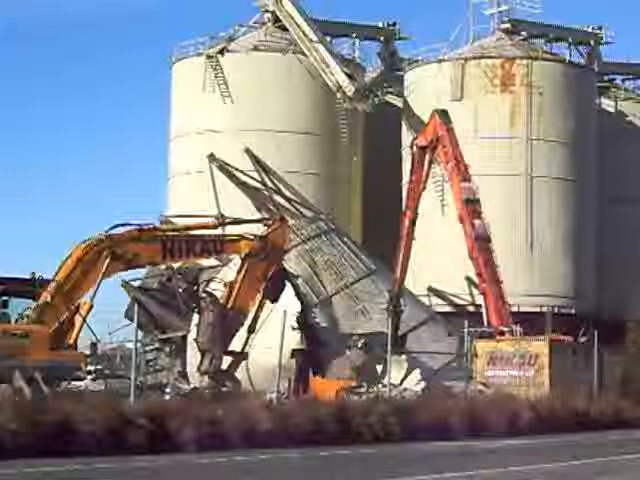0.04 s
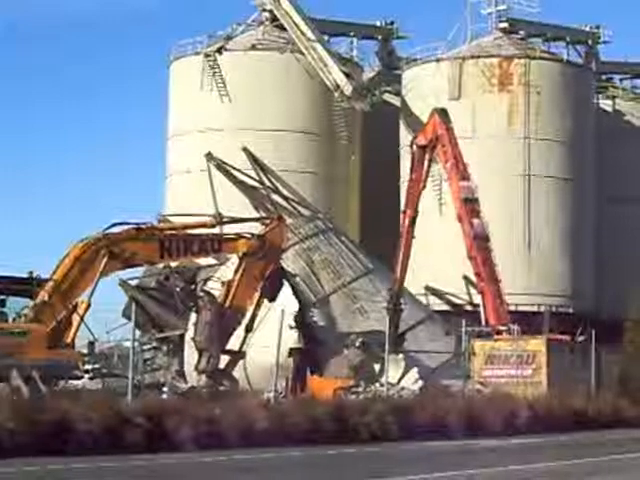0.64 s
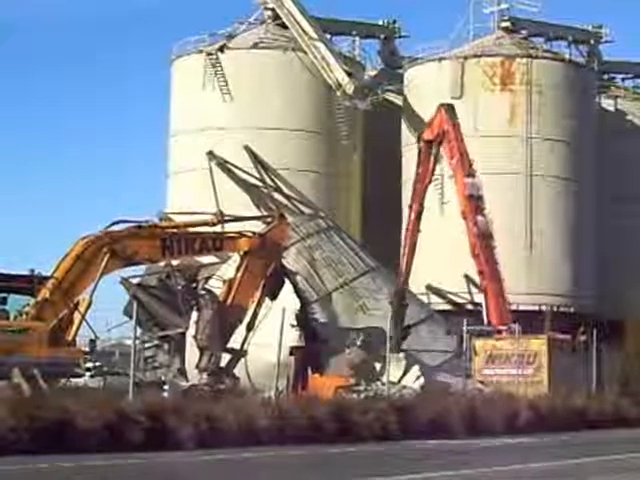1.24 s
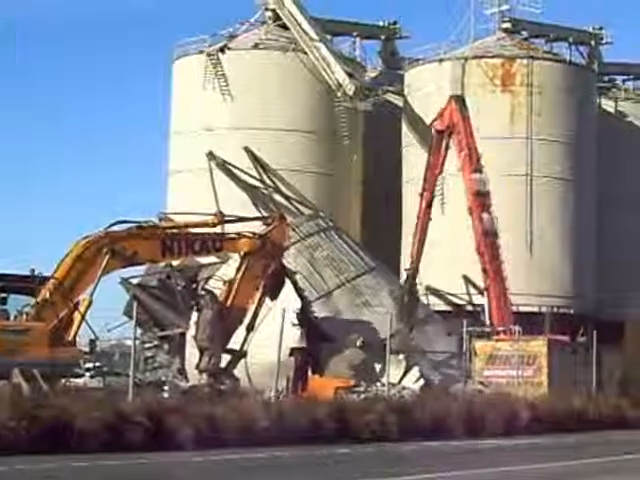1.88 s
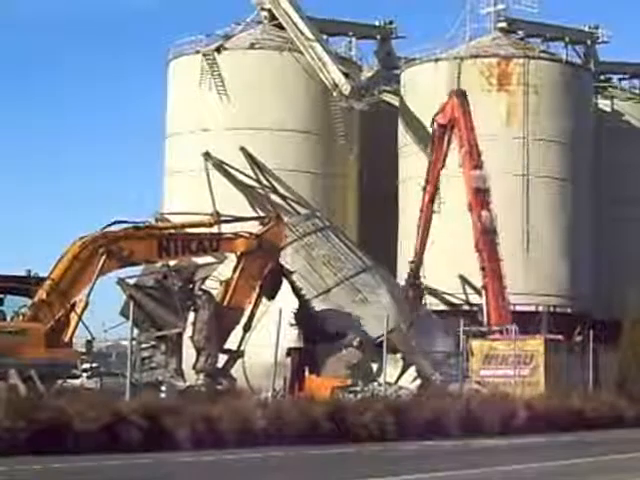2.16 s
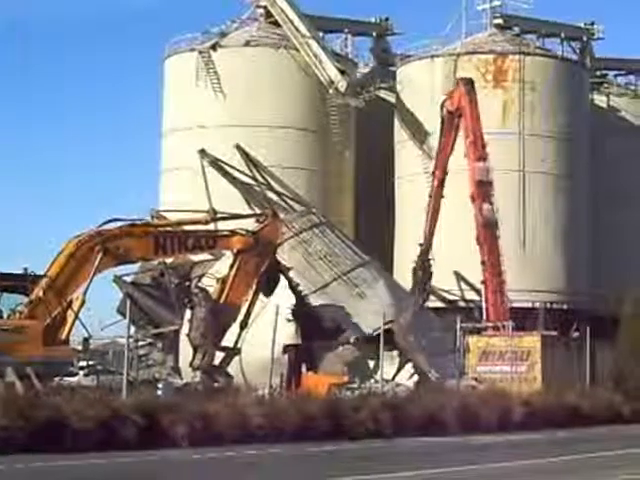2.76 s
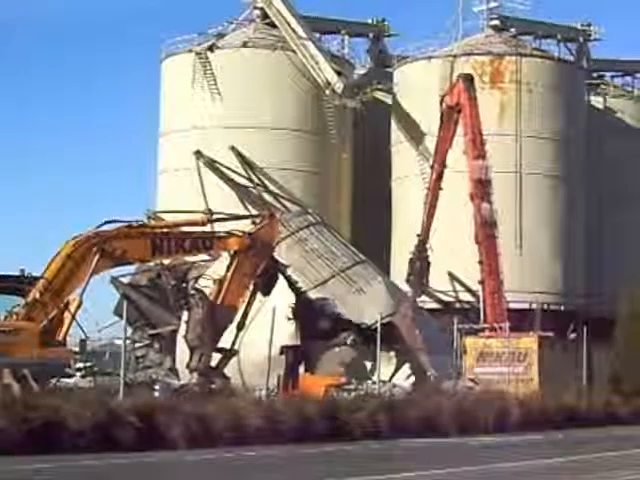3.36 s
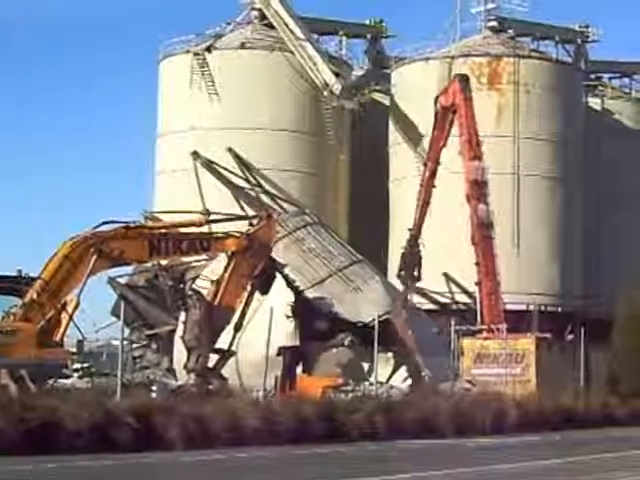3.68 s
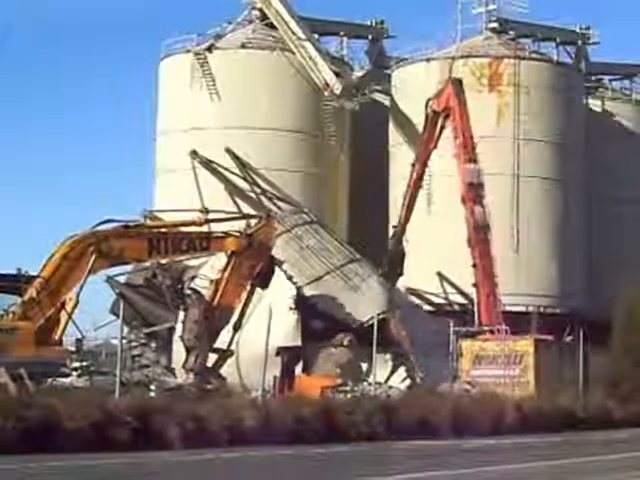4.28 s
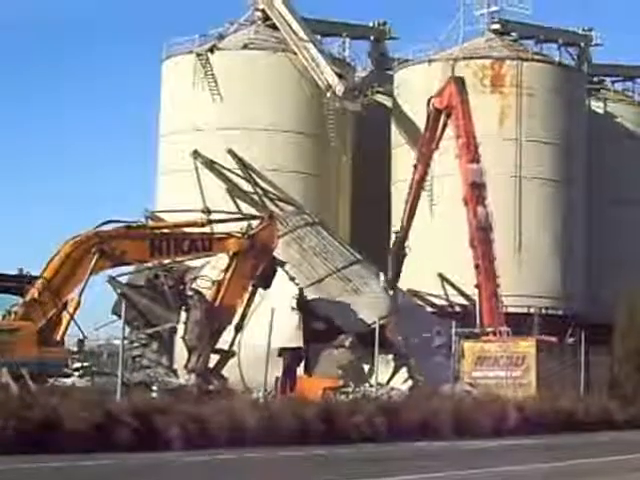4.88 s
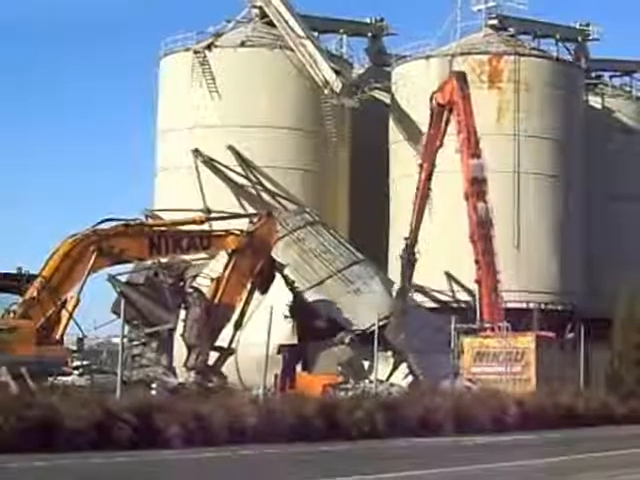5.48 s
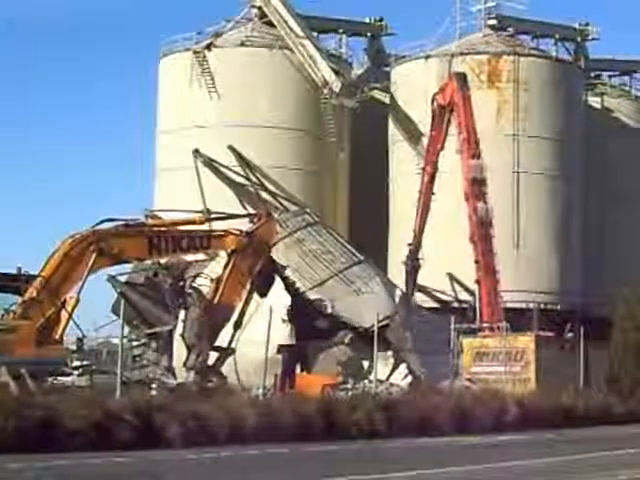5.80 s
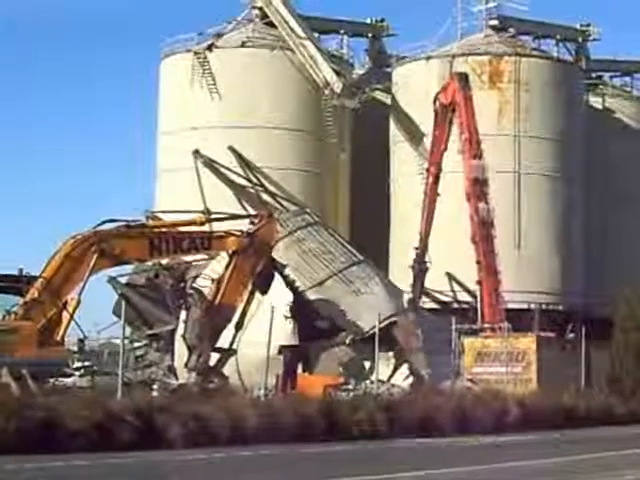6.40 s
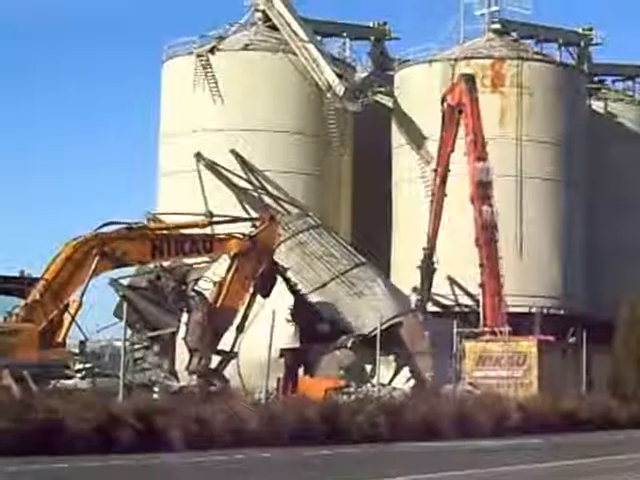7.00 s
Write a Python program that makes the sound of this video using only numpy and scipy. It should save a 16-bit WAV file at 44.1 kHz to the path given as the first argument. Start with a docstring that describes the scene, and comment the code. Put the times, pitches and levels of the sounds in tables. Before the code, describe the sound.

Heard from across a road, demolition machines hum steadily as they pull at a steel silo. Faint creaks and ticks lead to a loud run of metal cracks, deep thuds, hollow booming and tumbling debris. Lighter snaps follow, then a rasping slide with a short squeal, and a last group of sharp cracks. Wind buffets the small microphone, growing stronger as the collapse begins.

```python
"""Tearing down a steel silo

Two excavators work across a road from a small microphone. Over the drone of their diesels the shell
creaks and gives way: steel cracks and snaps, the hollow drum booms, rubble pours, and a plate scrapes
down with a short squeal. Cracks and snaps echo off the standing silos; wind rumbles on the microphone."""
import sys
import numpy as np
from scipy import signal
from scipy.fft import rfft, irfft, next_fast_len
from scipy.io import wavfile
from scipy.ndimage import uniform_filter1d, minimum_filter1d

SR = 44100
rng = np.random.default_rng(int(sys.argv[2]) if len(sys.argv) > 2 else 0)


def waveform_to_disk(signal):
    """Save audio, clipped to [-1, 1], as 16-bit WAV at the path in sys.argv[1]."""
    frames = np.transpose(np.atleast_2d(signal))
    scaled = np.clip(frames, -1, 1) * 32767
    samples = np.round(scaled).astype(np.int16)
    wavfile.write(sys.argv[1], SR, samples)


N = 319725
TIME = np.arange(N) / SR

# The working diesel picks up speed and holds it. Each row: time in seconds, firing rate in Hz, level in dB.
DIESEL_RUN = [(0.21, 84.7, -31), (0.55, 86.9, -23), (0.798, 90.5, -26), (1.85, 93.3, -25), (2.3, 91, -27.5),
              (5.198, 93, -26), (6.2, 92.3, -35.5), (7.25, 90.4, -31)]
# Steadier tones of the machines. Each row: pitch in Hz, level in dB.
MACHINE_HUMS = [(76.5, -32), (214, -39), (259, -41.5), (544, -47), (768, -54.5)]
# Wind on the microphone. Each row: time in seconds, level in dB.
WIND_LEVELS = [(0.21, -36), (1.7, -38), (2.6, -22.5), (3.4, -25), (4.5, -25.5), (7.25, -25.5)]
# Faint dry ticks close by. Each row: time in seconds, relative level in dB.
NEAR_TICKS = [(0.2514, -23), (0.272, -21), (0.6216, -23), (0.808, -23), (1.1102, -22), (1.431, -19),
              (1.447, -17.5), (1.4643, -19), (1.66, -18.5), (2.1121, -11.5)]
# Steel crackling under the pull of the machines. Each row: time in seconds, relative level in dB.
STRAIN_LEVELS = [(0.25, -39), (1.0, -38.5), (1.7, -29.5), (2.3, -33), (4.1, -34.5), (4.7, -29),
                 (7.25, -38.5)]
# Loaded steel creaks. Each row: start and length in seconds, first and last pitch in Hz, level in dB.
STEEL_CREAKS = [(.27, .06, 850, 915, -37), (0.555, 0.16, 782, 797, -33), (0.922, 0.092, 820, 914, -34)]
# Steel giving way. Each row: start in seconds, tear level in dB, tear decay in seconds,
# clatter level in dB, clank level in dB. The levels are relative.
STEEL_CRACKS = [(0.423, -23.5, 0.02, -31.5, -24), (0.511, -29.5, 0.009, -46.5, -26),
                (1.727, -33.5, 0.0077, -23, -21), (1.821, -17, 0.016, -24.5, -14),
                (2.277, -22.5, 0.0042, -28.5, -34), (2.388, -16.5, 0.022, -36, -40),
                (2.401, -4, 0.014, -21, -10.5), (2.497, -24.5, 0.016, -42, -30),
                (2.569, -22, 0.0096, -38, -18), (2.724, -13.5, 0.013, -19, -18),
                (3.048, -12.5, 0.0032, -28, -20.5), (3.220, -11.5, 0.0092, -23.5, -21.5),
                (3.553, -19.5, 0.023, -31, -16), (5.903, -20.5, 0.033, -28, -31),
                (6.274, -7, 0.0043, -23, -10.5), (6.328, -18, .012, -30, -20.5),
                (6.587, -5.5, 0.012, -19, -13)]
# Ring of the torn plates. Each row: pitch in Hz, relative level in dB, seconds to fall by 60 dB.
PLATE_MODES = [(1717, 6.5, 0.21), (2000, -0.5, 0.21), (2210, -10.5, 0.087), (2410, -3, 0.18),
               (2610, -6.5, 0.27), (2750, -7.5, 0.04), (2710, 5.5, 0.14), (3250, -6.5, 0.2),
               (3800, -7.5, 0.029)]
# Slap off the standing silos. Each row: delay in seconds, level in dB.
SILO_ECHOES = [(.028, -7.5), (.056, -23), (.093, -13.5)]
# Sections coming down. Each row: start in seconds, then relative levels of rubble, boom and grit in dB.
SECTION_FALLS = [(1.705, -18, -19.5, -37), (1.92, -21.5, -17.5, -32.5), (2.22, -31.5, -18.5, -38.5),
                 (2.38, -27, -12, -41), (2.715, -17, -13.5, -25), (3.22, -22.5, -14, -38.5),
                 (3.539, -28.5, -18.5, -33.5), (4.0, -32, -22, -46), (4.6, -34, -29, -42),
                 (4.98, -39, -30, -42), (5.72, -33, -21.5, -38), (5.9, -24, -20, -26.5),
                 (6.261, -21, -18, -39), (6.585, -25.5, -24.5, -25)]
# Treble fizz on the hardest blows. Each row: start in seconds, level in dB, decay in seconds.
FIZZ_BURSTS = [(2.402, -27, .008), (2.516, -30, .001), (6.588, -31, .006)]
# Heavy pieces landing. Each row: start in seconds, level in dB, pitch in Hz, decay in seconds.
HEAVY_THUDS = [(2.440, -5.5, 171.5, 0.048), (2.508, 0, 148, 0.029), (2.586, -3, 126, .03),
               (2.730, -5.5, 193, 0.038), (3.690, -10, 59.1, 0.034), (4.083, -2, 98.5, 0.015)]
# Small pieces snapping. Each row: start in seconds, level in dB.
SMALL_SNAPS = [(3.1006, -17), (3.364, -22), (3.7188, -24), (3.8125, -17.5), (3.8746, -25.5), (3.944, -27),
               (4.0254, -19), (4.0793, -21), (4.209, -15), (4.2663, -17.5), (4.339, -22), (4.3959, -15.5),
               (5.46, -24), (5.706, -19), (5.8553, -23.5), (7.0929, -23.5)]
# A plate jerks downward. Each row: start in seconds, seconds to full speed, level in dB.
PLATE_SLIDES = [(4.564, .03, -29.5), (4.745, 0.029, -27.5), (4.798, 0.1, -18.5), (5.255, 0.011, -28.5)]

# Tone colours of the noise layers. Each row: frequency in Hz, relative level in dB.
ROAR_SPECTRUM = [(66, -29.5), (112, -4), (117, -4.5), (139, 0.5), (219, -2.5), (314, -12), (356, -7.5),
                 (409, -15), (560, -9), (664, -16.5), (753, -15), (1200, -25.5), (1780, -30.5),
                 (2710, -27.5), (4680, -47.5), (6080, -77), (10300, -120)]  # fans and hydraulics
WIND_SPECTRUM = [(8, -33), (15, -9.5), (35, -4.5), (62, -2.5), (85, -0.5), (120, -6.5), (200, -48)]  # buffeted microphone
SHARD_SPECTRUM = [(820, -35), (1400, -20.5), (1510, -24), (1700, -10), (1880, -7.5), (2030, -6.5),
                  (2450, -3), (2900, -3.5), (3320, -5.5), (4020, -20), (4300, -22), (4680, -28.5),
                  (6080, -44.5), (10300, -120)]  # grit and steel splinters
CLANK_SPECTRUM = [(150, -29), (300, -6.5), (400, -7), (540, 7.5), (750, -3.5), (1030, -3), (1300, -12.5),
                  (1450, -22), (1680, -18), (1950, -12.5), (2400, -23), (3500, -65)]  # body of a struck plate
SHELL_SPECTRUM = [(32, -42), (55, -17.5), (91, -1), (177, 2.5), (259, -4), (302, -5), (398, -18),
                  (430, -16), (560, -56), (950, -120)]  # hollow silo
RUBBLE_SPECTRUM = [(160, -29.5), (270, -3), (313, 3), (404, -11), (479, 0.5), (560, -1), (660, -4.5),
                   (1000, -9), (1330, -15.5), (1450, -33), (1600, -20), (2080, -54.5), (3520, -120)]  # tumbling lumps
FIZZ_SPECTRUM = [(4000, 2.5), (5500, 0), (8000, -1.5), (11000, -7), (13500, -32)]  # harsh treble
SCRAPE_SPECTRUM = [(470, -40.5), (800, -18), (881, -4), (1130, -3.5), (1450, -17), (1560, -18), (1840, -13),
                   (2500, -1), (2810, -7), (3190, -3.5), (4680, -25.5), (6080, -59), (10300, -120)]  # sliding plate


def gain_of(db):
    """Decibels to amplitude."""
    return 10 ** (np.asarray(db) / 20)


def evened(x):
    """Scales to an rms of 1."""
    return x / np.sqrt(np.mean(x ** 2) + 1e-20)


def steadied(x, seconds, share):
    """Irons a share of the chance swells out of a noise; rms 1."""
    power = uniform_filter1d(x ** 2, size=max(int(seconds * SR), 1))
    return evened(x / (abs(power) + 1e-9) ** (share / 2))


def fader(rows):
    """Gain ride through rows with seconds first and dB last; silent before the first row."""
    rows = np.asarray(rows)
    return gain_of(np.interp(TIME, rows[:, 0], rows[:, -1], left=-100))


def add(mix, start, sound):
    """Mixes a sound in at a start time in seconds."""
    part = mix[round(start * SR):][:len(sound)]
    part += sound[:len(part)]


def colour(x, spectrum, size=8192):
    """Minimum-phase EQ with the given spectrum; white noise keeps its level."""
    hz, db = np.transpose(spectrum)
    bins = abs(np.fft.fftfreq(size, 1 / SR))
    curve_db = np.interp(np.log(bins + 1), np.log(hz + 1), db, right=-100)
    log_gain = np.log(gain_of(curve_db) + 1e-5)
    taps = np.fft.ifft(np.exp(np.conj(signal.hilbert(log_gain)))).real[:size // 2]
    return signal.oaconvolve(x, taps / np.linalg.norm(taps))[:len(x)]


def drift(rate_hz):
    """Smooth random wander of rms 1."""
    size = next_fast_len(N)
    rolloff = np.exp(-(np.fft.rfftfreq(size, 1 / SR) / rate_hz) ** 2)
    return evened(irfft(rfft(rng.standard_normal(size)) * rolloff, size)[:N])


def tone(hz):
    """A sine that follows a pitch curve."""
    return np.sin(2 * np.pi * np.cumsum(hz) / SR)


def impacts(per_s, spread_db):
    """A random train of tiny blows; the wider the spread, the more a few stand out."""
    sizes = gain_of(spread_db * np.minimum(rng.exponential(1, N), 4))
    return evened(sizes * rng.choice([-1, 1], N) * (rng.random(N) < per_s / SR))


def burst(spectrum, count=30000):
    """A short, even stretch of coloured noise."""
    noise = colour(rng.standard_normal(count + 2000), spectrum, size=2048)[-count:]
    return steadied(noise, seconds=.003, share=.7)


def surge(start, rise, hold, db_per_s, t=TIME):
    """Envelope that rises and holds for the given seconds, then dies away at a steady rate."""
    fade_db = -db_per_s * np.maximum(t - start - rise - hold, 0)
    return np.clip((t - start) / rise, 0, 1) * gain_of(fade_db)


def collapse(starts, levels_db, **shape):
    """Envelope of a layer fed by all the falls; their surges add in power."""
    t = TIME[::64]
    power = sum((gain_of(db) * surge(start, t=t, **shape)) ** 2 for start, db in zip(starts, levels_db))
    return np.interp(TIME, t, np.sqrt(power))


def settling(db):
    """Steady gain from the first fall on: the wreck never quite comes to rest."""
    return gain_of(db) * np.clip((TIME - SECTION_FALLS[0][0]) / .05, 0, 1)


def machines():
    """Exhaust tone of the working diesel, wavering hums, and the roar of fans and hydraulics."""
    times, firing_hz, _ = np.transpose(DIESEL_RUN)
    hunting_hz = np.interp(TIME, [1.7, 3], [.4, 1.8]) * drift(8)  # the engine hunts under load
    pitch = np.interp(TIME, times, firing_hz) + hunting_hz
    firing = tone(pitch)
    exhaust = firing + gain_of(-11.5) * tone(2 * pitch)
    exhaust = evened(exhaust * gain_of(0.71 * drift(8))) * fader(DIESEL_RUN)
    hums = np.zeros(N)
    for hz, db in MACHINE_HUMS:
        waver = gain_of(2 * drift(16))
        hums += gain_of(db) * evened(waver * tone(hz * (1 + 0.01026 * drift(14))))
    roar = colour(rng.standard_normal(N) * (1 + 0.11 * firing), ROAR_SPECTRUM)
    return exhaust + hums + gain_of(-27) * steadied(roar, seconds=0.091, share=1.0)


def wind():
    """Lumpy low rumble on the microphone, swelling in gentle random gusts."""
    gust_db = -drift(rate_hz=2.5)
    rumble = colour(rng.standard_normal(N), WIND_SPECTRUM, size=32768)
    return steadied(rumble, seconds=0.13, share=0.72) * fader(WIND_LEVELS) * gain_of(gust_db)


def ticks():
    """Tiny dry clicks, too near to echo."""
    t = np.arange(-SR // 200, SR // 200) / SR
    click = np.exp(-(t / 0.00022) ** 2) * np.sin(2 * np.pi * 1650 * t)
    out = np.zeros(N)
    for time, db in NEAR_TICKS:
        add(out, time + t[0] + 0.00052, gain_of(db + 4) * click)
    return out


def grit():
    """Grit crackles on the strained sheet metal and flares with each fall."""
    starts, _, _, grit_db = np.transpose(SECTION_FALLS)
    flares = collapse(starts, grit_db, rise=.08, hold=0.13, db_per_s=42)
    grains = steadied(colour(impacts(per_s=1900, spread_db=2), SHARD_SPECTRUM), seconds=.1, share=.4)
    return gain_of(-4.5) * grains * np.hypot(flares, fader(STRAIN_LEVELS))


def creaks():
    """Short, rough tones that rise as the load on the steel grows."""
    waver_hz = 22 * drift(90)
    flutter = evened(gain_of(3 * drift(70)))
    out = np.zeros(N)
    for start, length, from_hz, to_hz, db in STEEL_CREAKS:
        progress = np.clip((TIME - start) / length, 0, 1)
        pitch = from_hz + (to_hz - from_hz) * progress + waver_hz
        out += gain_of(db) * np.sin(np.pi * progress) * tone(pitch)
    return out * flutter


def cracks():
    """Each crack is a bright tear, a dull clank of the plate and a dying clatter of fragments."""
    # Tearing steel is strongest near 2690 Hz and falls off to both sides.
    tear_spectrum = [(hz, db - 15.5 * abs(np.log2(hz / 2690))) for hz, db in SHARD_SPECTRUM]
    tears, clanks, clatter_power = np.zeros((3, N))
    for start, tear_db, decay, clatter_db, clank_db in STEEL_CRACKS:
        tear = burst(tear_spectrum)
        t = np.arange(len(tear)) / SR
        attack = 1 - np.exp(-t / 0.00098)
        tear_shape = attack * np.exp(-t / decay)
        clank_shape = attack * (np.exp(-t / 0.01) + 0.3 * np.exp(-t / 0.25))
        add(tears, start, gain_of(tear_db) * tear * tear_shape / tear_shape.max())
        add(clanks, start, gain_of(clank_db) * burst(CLANK_SPECTRUM) * clank_shape)
        add(clatter_power, start, (gain_of(clatter_db) * np.exp(-t / 0.17)) ** 2)
    pieces = colour(impacts(per_s=2500, spread_db=1.5), SHARD_SPECTRUM)
    clatter = steadied(pieces, seconds=0.011, share=0.89) * np.sqrt(clatter_power)
    blows = gain_of(-0.5) * tears + gain_of(-20.5) * plate_ring(tears + .5 * clatter) + clanks
    return yard_echo(blows, wet_db=-16, t60=0.41) + clatter


def plate_ring(drive):
    """The steel plates ring in their decaying modes when shaken."""
    t = np.arange(SR // 3) / SR
    modes = sum(gain_of(db - 60 * t / t60) * np.sin(2 * np.pi * (hz * t + rng.random()))
                for hz, db, t60 in PLATE_MODES)
    return signal.oaconvolve(drive, modes / np.linalg.norm(modes))[:len(drive)]


def yard_echo(x, wet_db, t60):
    """The direct sound, smeared echoes off the silos and a thin scattered tail."""
    t = np.arange(SR) / SR
    tail = rng.standard_normal(SR) * gain_of(-60 * t / t60) * (t > .012)
    response = gain_of(wet_db) * tail / np.linalg.norm(tail)
    response[0] = 1
    for delay, db in SILO_ECHOES:
        smear = rng.standard_normal(SR // 20) * np.exp(-t[:SR // 20] / 0.0043)
        add(response, delay, gain_of(db) * smear / np.linalg.norm(smear))
    return signal.oaconvolve(x, response)[:N]


def shell_boom():
    """Countless buckles drum on the hollow silo after each fall."""
    starts, _, boom_db, _ = np.transpose(SECTION_FALLS)
    swells = collapse(starts, boom_db, rise=.11, hold=0.078, db_per_s=16)
    buckles = colour(impacts(per_s=900, spread_db=2), SHELL_SPECTRUM)
    return steadied(buckles, seconds=.04, share=0.79) * np.hypot(swells, settling(db=-26.5))


def rubble():
    """Each fall pours lumps of rubble with a dull clatter."""
    starts, rubble_db, _, _ = np.transpose(SECTION_FALLS)
    pours = collapse(starts, rubble_db, rise=0.041, hold=0.091, db_per_s=21.8)
    lumps = colour(impacts(per_s=1300, spread_db=0), RUBBLE_SPECTRUM)
    return steadied(lumps, seconds=0.046, share=1.0) * np.hypot(pours, settling(db=-34.5))


def moan():
    """One hollow mode of the folding wall, shaken so hard that pitch and level flutter."""
    mode = evened(tone(565 + 20 * drift(30.1)) * gain_of(2.3 * drift(30)))
    return gain_of(-22.5) * mode * surge(start=1.725, rise=0.023, hold=0.046, db_per_s=25)


def fizz():
    """Brief harsh bursts in the treble, and one sharp click on top of the heaviest thud."""
    t = np.arange(SR // 8) / SR
    out = np.zeros(N)
    for start, db, decay in FIZZ_BURSTS:
        add(out, start, gain_of(db) * burst(FIZZ_SPECTRUM, count=len(t)) * np.exp(-t / decay))
    click = np.exp(-((TIME - 2.5167) / .0005) ** 2) * np.sin(2 * np.pi * 3850 * TIME)
    return out + gain_of(-7) * click


def thuds():
    """Heavy pieces land with a few low swings each."""
    t = np.arange(SR // 2) / SR
    attack = 1 - np.exp(-t / 0.0055)
    out = np.zeros(N)
    for start, db, hz, decay in HEAVY_THUDS:
        add(out, start, gain_of(db) * attack * np.exp(-t / decay) * np.sin(2 * np.pi * hz * t))
    return out


def snaps():
    """Small pieces snap: a sharp tick, a trace of splinters, and a bounce off the ground just behind."""
    t = np.arange(SR // 20) / SR
    out = np.zeros(N)
    for (start, db), (detune, lag) in zip(SMALL_SNAPS, rng.uniform(-1, 1, (len(SMALL_SNAPS), 2))):
        tick = np.sin(2 * np.pi * 2850 * (1 + .08 * detune) * t) * t * np.exp(-t / .0005)
        splinters = burst(SHARD_SPECTRUM, count=len(t)) * np.exp(-t / 0.0076)
        snap = gain_of(db) * (tick / abs(tick).max() + .25 * splinters)
        add(out, start, snap)
        add(out, start + 0.0037 * (1 + .3 * lag), 0.77 * snap)
    return yard_echo(out, wet_db=-7, t60=0.13)


def scrape():
    """Rapid slips rasp and ring as a plate jerks into motion and slows."""
    sliding = np.zeros(N)
    for start, rise, db in PLATE_SLIDES:
        age = np.maximum(TIME - start, 0) / rise
        sliding = np.hypot(sliding, gain_of(db) * age * np.exp(1 - age))
    slips = colour(impacts(per_s=2200, spread_db=-2), SCRAPE_SPECTRUM)
    slips = steadied(slips, seconds=0.033, share=0.26)
    return evened(slips + gain_of(-17) * plate_ring(slips)) * sliding


def squeal():
    """Near full speed the plate's slips lock for a moment into one shrill note."""
    note = evened(tone(3080 + 22 * drift(68)) * gain_of(4 * drift(70)))
    return gain_of(-19) * note * surge(start=4.81, rise=.025, hold=.05, db_per_s=180)


def scene():
    """The work is straight ahead, so both channels hear the same."""
    far = machines() + creaks() + shell_boom() + thuds() + moan() + rubble() + grit()
    far += cracks() + snaps() + scrape() + squeal()
    mono = far + ticks() + wind()
    return np.array([mono, mono])


def low_pass(x, hz):
    """Steep linear-phase low-pass."""
    padded = np.pad(x, ((0, 0), (200, 200)), "reflect", reflect_type="odd")
    taps = signal.firwin(401, hz, window=("kaiser", 9), fs=SR)
    return signal.oaconvolve(padded, taps[None], "valid")


def limited(x, ceiling=.98, size=61):
    """Ducks smoothly for a few milliseconds round each peak that passes the ceiling."""
    safe_gain = np.minimum(ceiling / (abs(x).max(0) + 1e-9), 1)
    return x * uniform_filter1d(minimum_filter1d(safe_gain, 2 * size), size)


def record(dry):
    """The narrow-band microphone opens after a moment and clips; fizz goes on top, then a limiter."""
    opened = dry * np.where(TIME < 0.21, gain_of(-77), 1)
    dulled = low_pass(np.clip(opened, -1, 1), hz=4950)
    return low_pass(limited(dulled + fizz()), hz=15400)


dry = scene()
out = record(dry)
waveform_to_disk(out)
```